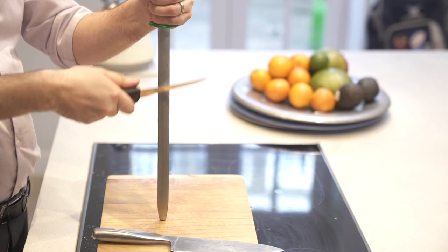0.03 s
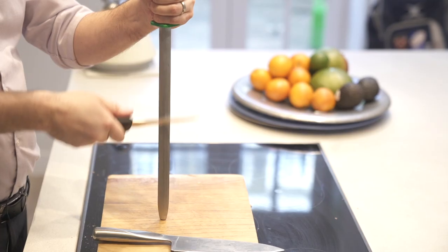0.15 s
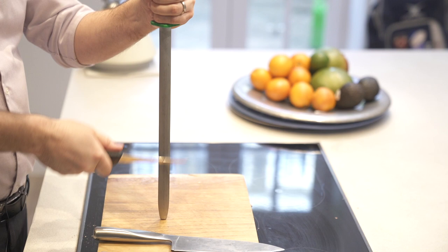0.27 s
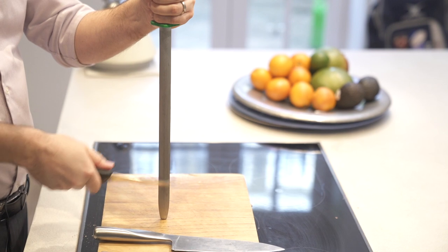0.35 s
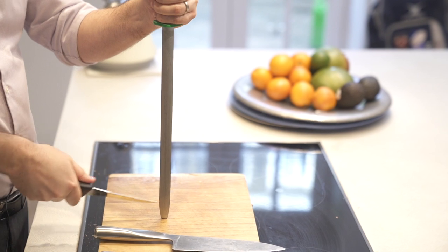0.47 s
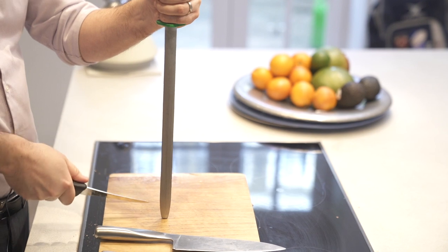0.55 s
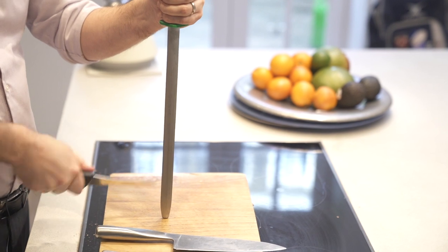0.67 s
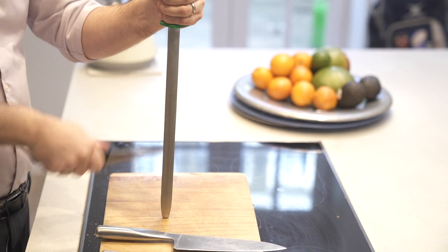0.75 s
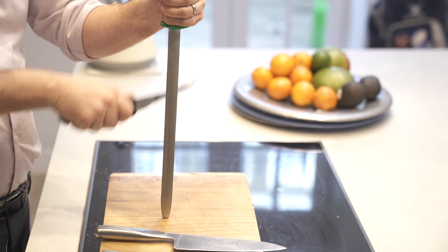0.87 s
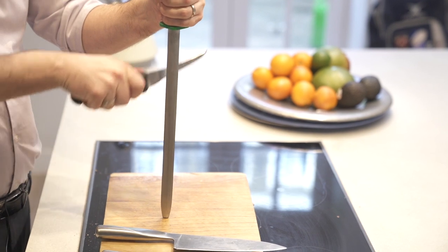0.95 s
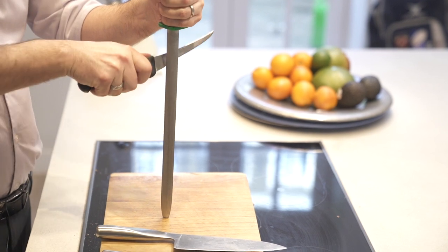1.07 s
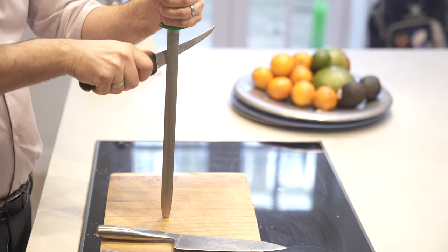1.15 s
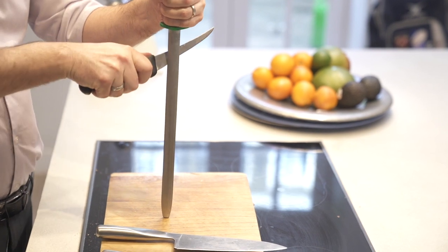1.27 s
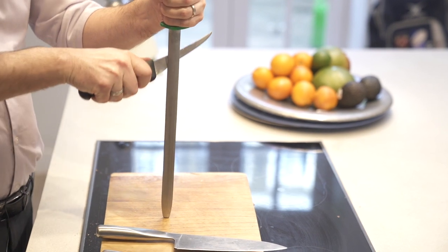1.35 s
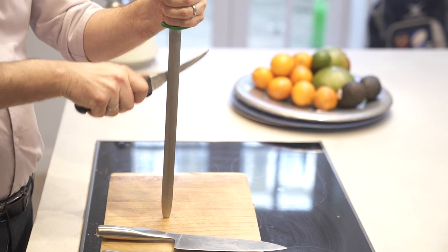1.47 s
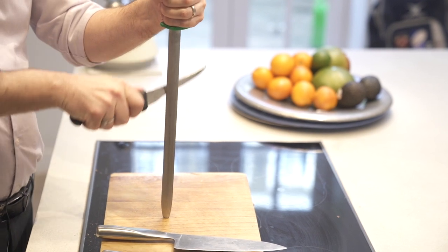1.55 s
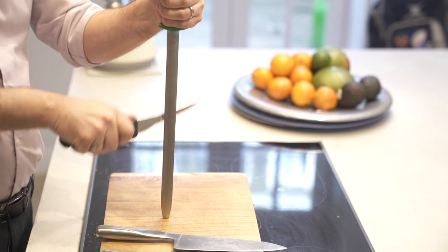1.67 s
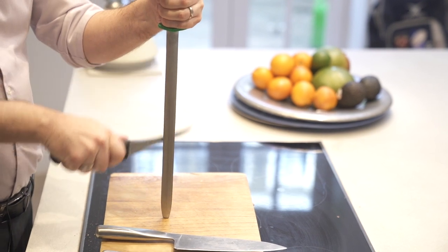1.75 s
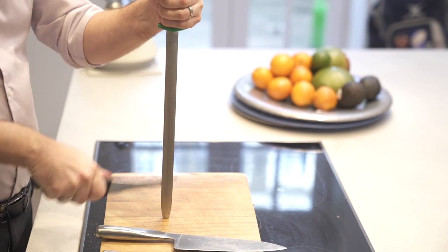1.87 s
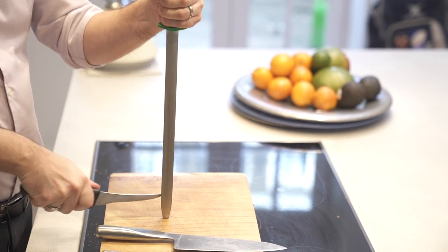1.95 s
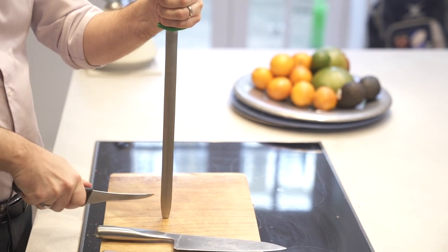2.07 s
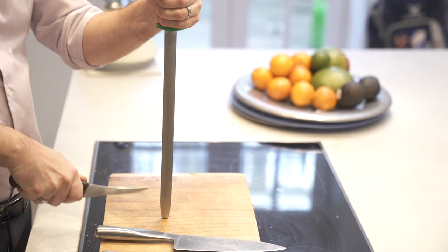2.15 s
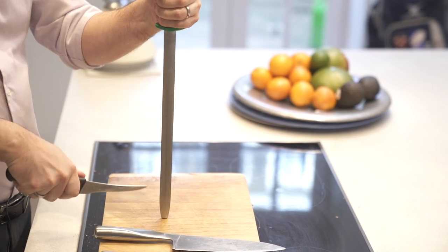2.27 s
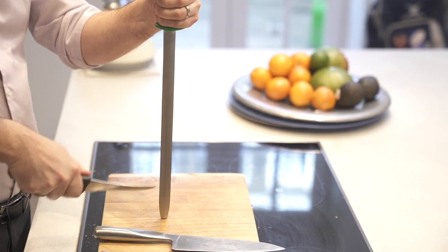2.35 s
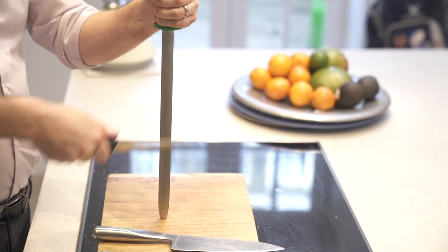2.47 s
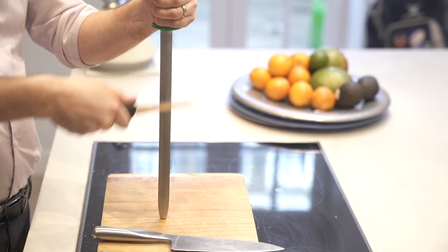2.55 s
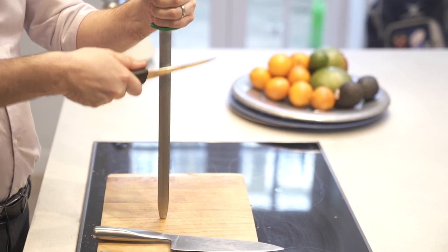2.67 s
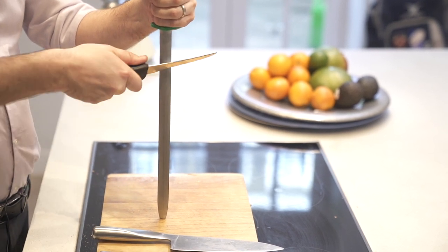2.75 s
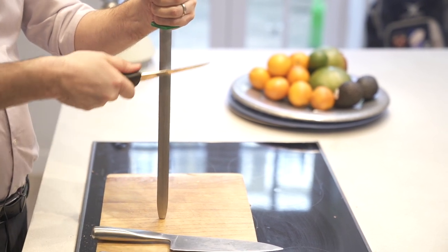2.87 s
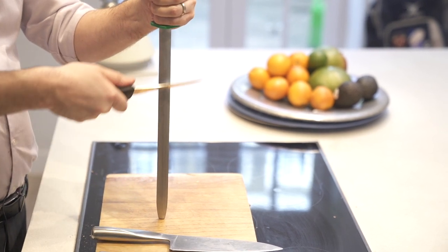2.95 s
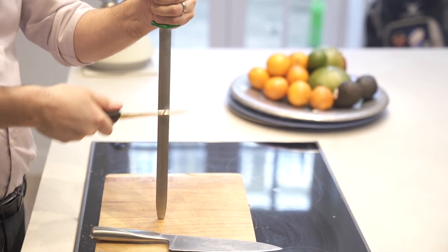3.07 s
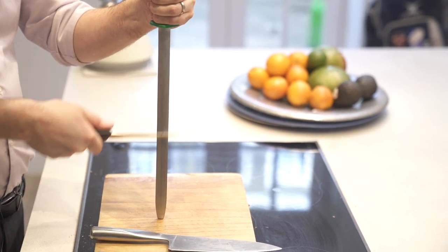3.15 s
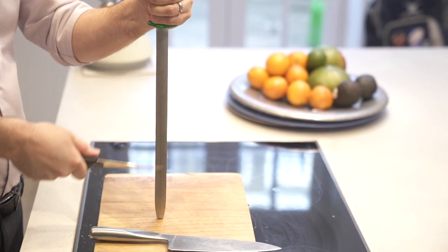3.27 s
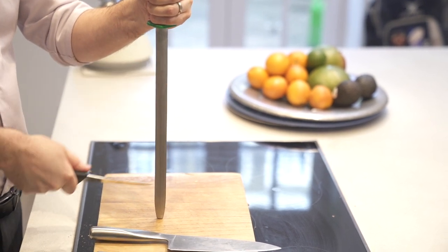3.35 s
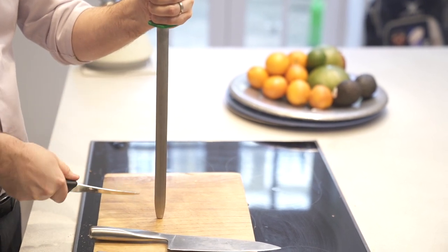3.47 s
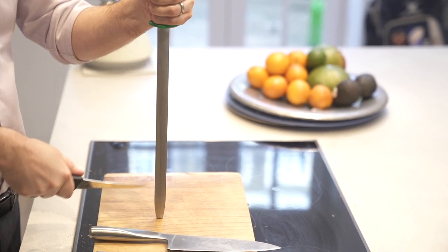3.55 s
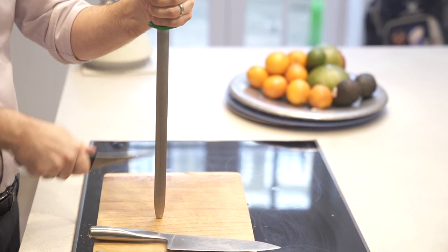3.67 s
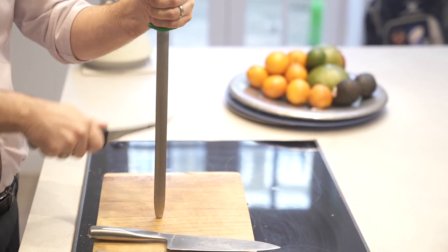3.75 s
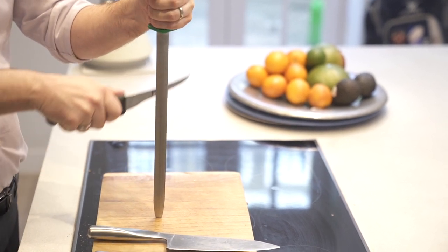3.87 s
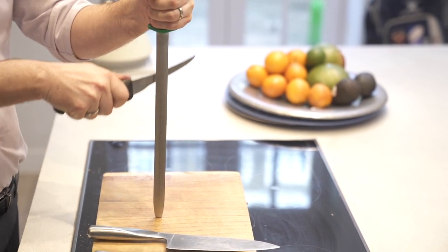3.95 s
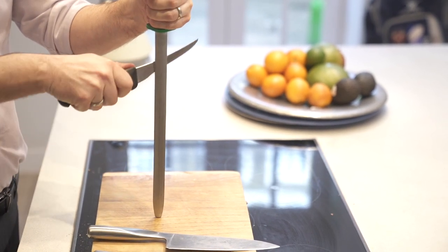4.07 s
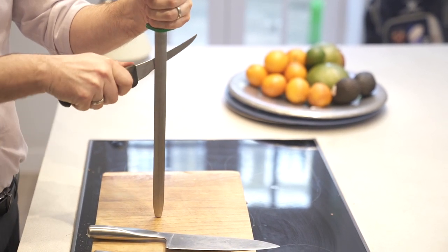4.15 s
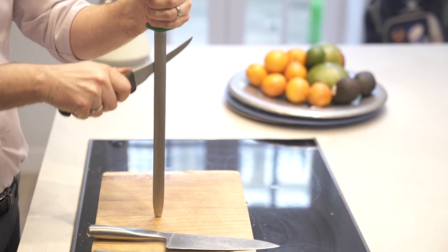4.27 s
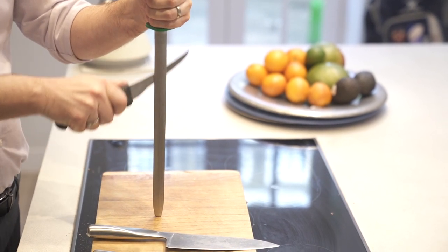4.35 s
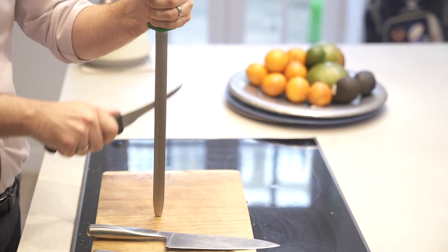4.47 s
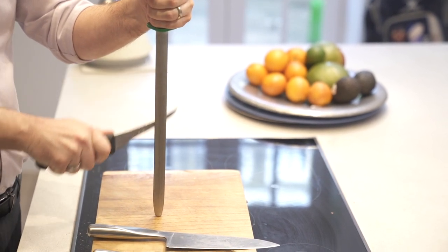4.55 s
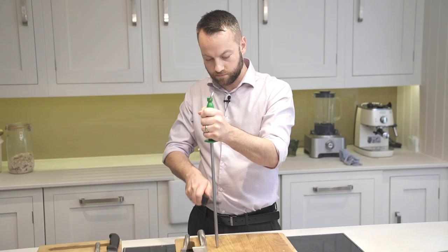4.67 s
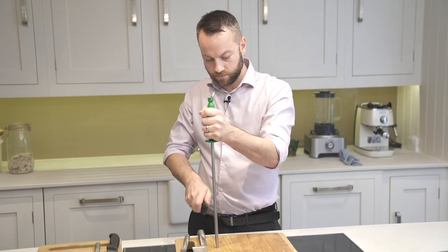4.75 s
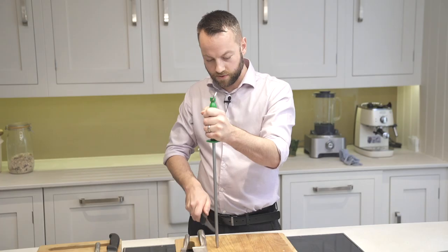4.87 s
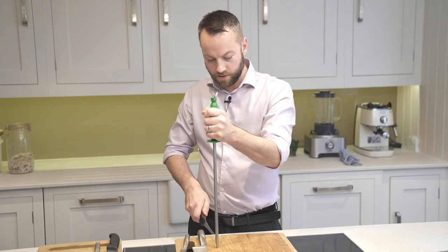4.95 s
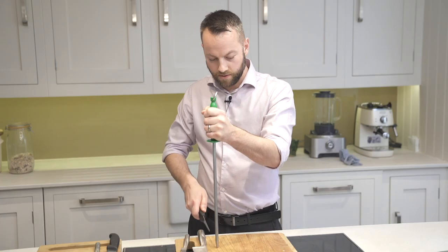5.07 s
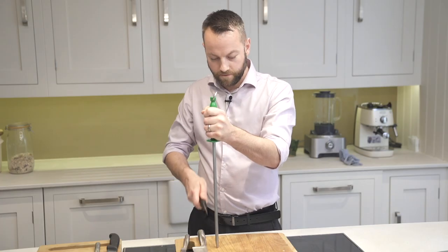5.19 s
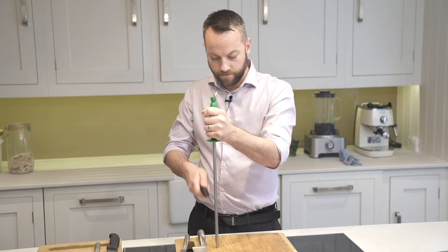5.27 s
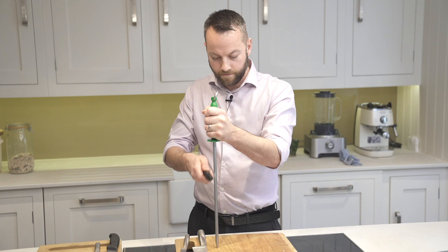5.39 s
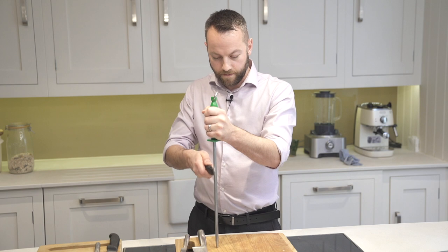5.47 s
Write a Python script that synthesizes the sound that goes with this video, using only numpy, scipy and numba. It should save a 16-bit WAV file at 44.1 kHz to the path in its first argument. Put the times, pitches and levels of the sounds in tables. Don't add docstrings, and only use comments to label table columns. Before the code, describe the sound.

A small knife is honed on an upright steel rod resting on a wooden board in a quiet, hard kitchen. After a very brief fade at the start, the first gritty scrape swells in and rises in pitch until about 0.55 s. A pause of low room hum follows; a small clink at 1.2 s leads to a long firm draw from roughly 1.35 to 2 s, sweeping up to a bright, sharp end. The handle knocks the board very softly at 2.2 s. A click at 2.73 s begins the third firm stroke, lasting to about 3.45 s with a crisp late tick at 3.4 s. Light taps and a dull thud near 4.15-4.3 s precede a lighter fourth scrape, fading out by 4.7 s. The wide stereo room then gives way to a darker mono lapel microphone, with faint scraping and tiny taps until 4.97 s, then only soft background noise, fading slightly to 5.7 s.

```python
import sys
import numpy as np
from scipy import signal
from scipy.fft import rfft, irfft, next_fast_len
from scipy.io import wavfile
from scipy.ndimage import uniform_filter1d
from numba import njit

SR = 44100
rng = np.random.default_rng(int(sys.argv[2]) if len(sys.argv) > 2 else 0)


def boost(x):
    u = np.asarray(x, float) / 20
    return 10 ** u


def dump(signal):
    limited = np.clip(np.atleast_2d(signal).T, -1, 1)
    pcm = np.round(limited * 32767).astype(np.int16)
    wavfile.write(sys.argv[1], SR, pcm)


N = 243546
T = np.arange(N) / SR
PAIR_S, LAPEL_S = 0.027, 4.708


def unit(x):
    return x / np.sqrt(np.mean(x ** 2))


def colour(x, points, share=1):
    hz, db = np.transpose(points)
    size = next_fast_len(x.shape[-1])
    bins = np.log(np.arange(size // 2 + 1) * SR / size + 1)
    gain = boost(share * np.interp(bins, np.log(hz), db))
    return irfft(rfft(x, size) * gain, size)[..., :x.shape[-1]]


@njit
def ring(x, hz, width):
    y, band, low = np.empty((2, len(x))), 0., 0.
    for i in range(len(x)):
        g, damping = np.tan(np.pi * hz[i] / SR), width[i] / hz[i]
        v = (band + g * (x[i] - low)) / (1 + g * (g + damping))
        y[0, i], y[1, i] = damping * v, low + g * v
        band, low = 2 * v - band, low + 2 * g * v
    return y


def mode(x, hz, width):
    hz = np.clip(hz + 0 * T, 50, .45 * SR)
    return ring(x + 1e-18, hz, width + 0 * T)[0] * np.sqrt(1000 / width)


def walk(rate):
    hold = int(SR / rate)
    steps = np.repeat(rng.standard_normal(N // hold + 1), hold)
    return uniform_filter1d(uniform_filter1d(steps, hold), hold)[:N]


# time in seconds, hand pressure as level in dB, first overhang note in Hz.
DRAWS = [
    [(0.03, -67.5, 800), (0.07, -58, 903), (0.166, -46.5, 1140), (0.27, -40, 1576), (0.358, -37.5, 2510),
     (0.49, -44, 3420), (0.56, -89, 3640)],
    [(1.22, -77, 676), (1.36, -53.5, 770), (1.5, -37, 849), (1.6, -40.5, 914), (1.7, -36, 1130),
     (1.81, -36, 1580), (1.87, -30.5, 2260), (1.93, -34, 3160), (1.98, -57, 3500)],
    [(2.75, -39, 842), (2.82, -55.5, 850), (2.89, -44.5, 834), (2.93, -40, 985), (3.05, -36.5, 1360),
     (3.17, -35.5, 2410), (3.252, -34, 2580), (3.36, -40, 2480), (3.47, -45.5, 2670)],
    [(4.16, -60, 950), (4.29, -62, 950), (4.316, -46.5, 910), (4.4, -42.5, 1110), (4.498, -47, 1420),
     (4.608, -49.5, 2120), (4.7, -72.5, 3000)],
    [(4.712, -75.5, 1140), (4.76, -61.5, 1140), (4.83, -57, 860), (4.895, -54, 1143), (4.92, -55.5, 961),
     (4.95, -63, 973)],
]
# level in dB of the first, second and heel-side notes,
# board thud at the heel in dB, brightness in dB.
HOLDS = [
    (0, 1, -2, -13, 7.5),
    (-5, 4.5, 2, 9.5, 6),
    (3, 0, -6, 8, 3.5),
    (2, 0.5, 0, 4.5, 2.5),
    (-2.5, 2, -6, -40, 10.5),
]
# third note in dB, tip note's start in Hz, its rise in Hz per second, its dB.
TIP_NOTES = [
    (1, 800, 280, -13),
    (-2, 1930, 360, -13),
    (-1, 1575, 2100, -6.5),
    (-2, 2170, 500, -12),
    (-7.5, 2400, 6100, -4),
]


def hand():
    level, level_db, hz, late, grip = np.zeros(N), np.zeros(N), np.zeros(N), np.zeros(N), np.zeros((9, N))
    for k, (draw, held) in enumerate(zip(DRAWS, np.hstack([HOLDS, TIP_NOTES]))):
        s, db, first_hz = np.transpose(draw)
        set_s = min(s[0] - .08, LAPEL_S) if k < 4 else LAPEL_S
        now = T >= set_s
        level_db[now] = np.interp(T, s, db)[now]
        level[now] = np.clip(np.minimum(T - s[0], s[-1] - T) / 0.0051, 0, 1)[now]
        hz[now] = np.interp(T, s, first_hz)[now]
        past_belly = (hz[now] > 1950) | (T[now] > LAPEL_S)
        late[now] = np.cumsum(past_belly) / SR
        grip[:, now] = held[:, None]
    return level * boost(level_db), level_db, hz, late, grip


# time in seconds, peak in dB, thud in dB, brightness in dB, length in seconds.
TOUCHES = [
    (1.1878, -27, 8, -2, 0.0038),
    (1.618, -31.5, -9.5, 6, 0.007),
    (2.7275, -23.5, 3.5, 2.5, 0.0049),
    (3.399, -22, -0.5, 9, 0.0035),
    (4.136, -33, -2, 0, 0.0072),
    (4.2, -51, 22.5, 0, 0.0077),
    (4.303, -47.5, 12, 6, 0.019),
    (4.497, -37, 0, 4, 0.005),
    (4.879, -54, -9, -8, 0.0051),
    (4.938, -53.5, -2, 16, 0.0032),
]
# pitch in Hz, level in dB.
GRIT_TONE = [(200, -13), (600, -12), (1500, -4.5), (4000, 1.5), (7000, -0.5), (10000, -8), (13000, -12),
             (16000, -9.5)]


def contact():
    grit = rng.standard_normal(N) * boost(2.12 * np.minimum(rng.exponential(size=N), 5))
    grit = unit(grit * boost(0.98 * walk(40) + 2.0 * walk(200)))
    low = signal.sosfilt(signal.butter(2, 1300, fs=SR, output="sos"), grit)
    high = signal.sosfilt(signal.butter(2, 7800, "high", fs=SR, output="sos"), grit)
    middle = grit - low - high
    level, level_db, hz, _, grip = hand()
    board_thud_db, bright_db = grip[3], grip[4]
    heel = np.clip(np.log(1500 / hz) / np.log(1.5), 0, 1)
    light_db = np.maximum(-43.5 - level_db, 0)
    thud_db = -7 + heel * (board_thud_db + 0.8617 * light_db)
    scrape = level * (boost(thud_db) * low + middle + boost(bright_db) * high)
    taps = 0
    for s, db, tap_thud_db, tap_bright_db, length in TOUCHES:
        burst = (T > s) * np.exp(-np.abs(T - s) / length) * boost(db)
        taps = taps + burst * (boost(tap_thud_db) * low + middle + boost(tap_bright_db) * high)
    return colour(np.array([scrape, taps]), GRIT_TONE)


# first note in Hz, then the first, second, third and heel-side levels in dB.
OVERHANG = [(705, 8.5, -37.5, -12, -12), (786, 7.5, -23, -13.5, -24.5), (922, -8, 9.5, -10.5, -4.5),
            (1130, 5.5, 2.5, 0.5, -9.5), (1450, -2.5, 3.5, -5, -35.5), (2030, -5, -1, -6, -4),
            (2580, -1.5, -2.5, -11, -2.5), (3500, -20, -4.5, -16, 1)]
# multiple of the first note, width relative to pitch,
# widening at the tip as a ratio, level in dB, rod note in Hz that holds it up.
BLADE_BENDING = [
    (1, 0.11, .1, -6, 420),
    (3.62, 0.065, 2.3, -6, 3670),
    (8.7, 0.13, 1.5, 4.5, 2800),
]
# pitch in Hz, width in Hz, level at the heel in dB, level at the tip in dB.
ROD_NOTES = [(278, 71, -7.5, -14.5), (484, 80, 1.5, 2.5), (822.4, 44, -7.5, -9), (1172, 47, -2.5, -37.5),
             (1835, 190, -6, -17), (2518, 78, -2, -7.5), (3640, 450, -2, -13), (4030, 360, -2, 1.5),
             (6240, 320, 4.5, -11), (7370, 140, -31, -39), (9080, 1200, 4.5, -11), (9000, 550, -31, -27.5),
             (12200, 600, -10, -17), (14970, 500, 3.5, -1)]


def steel(scrape, taps):
    force = scrape + boost(-8) * taps
    _, _, hz, late, grip = hand()
    first_grip, second_grip, heel_grip, _, _, third_grip, tip_start_hz, tip_rise, tip_db = grip
    at, *columns = np.transpose(OVERHANG)
    first_db, second_db, third_db, heel_db = (np.interp(np.log(hz), np.log(at), c) for c in columns)
    bend_db = (first_db + first_grip, second_db + second_grip, third_db + third_grip)
    travel = np.clip(np.log(hz / 950) / np.log(2.4), 0, 1)

    heel_hz = np.maximum(7150 - 4500 * late, 6250)
    blade = boost(heel_db + heel_grip) * mode(force, heel_hz, 480)

    tip_hz = tip_start_hz + tip_rise * late
    tip_width = 0.2 * tip_hz
    swell = np.minimum(late / 0.035, 1)
    tip = swell * ring(force, tip_hz, 2 * tip_width)[0]
    blade = blade + boost(tip_db) * mode(tip, tip_hz, tip_width)

    for (multiple, relative_width, widen, db, rod_hz), more_db in zip(BLADE_BENDING, bend_db):
        centre = np.minimum(((multiple * hz) ** 14 + rod_hz ** 14.) ** (1 / 14), 17000)
        centre = np.minimum(centre * (1 + (.012 + .05 * travel) * walk(90)), .4 * SR)
        width = relative_width * centre * (1 + widen * travel)
        blade = blade + boost(db + more_db) * mode(ring(force, centre, 2 * width)[0], centre, width)

    soaked = ring(force + 1e-18, centre, 1.65 * centre)[1]
    soaked = ring(soaked, centre, 1.25 * centre)[1]
    soaked = soaked + boost(-11.5) * scrape + boost(-7) * taps
    drive = soaked + boost(-9.0) * blade
    rod = 0
    for k, (rod_hz, width, near_db, far_db) in enumerate(ROD_NOTES):
        push = drive * boost(near_db + (far_db - near_db) * travel)
        rod = rod + (-1) ** k * mode(push, rod_hz, width)
    return boost(2.5) * (boost(4.5) * blade + boost(-3.5) * rod + boost(-5.5) * soaked)


# time in seconds, peak in dB, length in seconds.
HANDLE_KNOCK = (2.203, -56.5, 0.022)
# pitch in Hz, width in Hz, level in dB.
BOARD_NOTES = [(800, 72, 12.5), (1450, 270, 11.5), (1850, 94, 15.5), (2140, 140, -23), (3670, 600, -4),
               (6200, 740, -31)]


def knock():
    s, db, length = HANDLE_KNOCK
    push = rng.standard_normal(N) * (T > s) * np.exp(-np.abs(T - s) / length) * boost(db)
    return sum(boost(note_db) * mode(push, hz, width) for hz, width, note_db in BOARD_NOTES)


# pitch in Hz, time to fall 60 dB in seconds.
ECHO_TIME = [(300, 0.7), (1200, 0.6), (4000, 0.48), (12000, 0.3)]
# pitch in Hz, side level minus mid level in dB.
ECHO_SIDE = [(100, -22.5), (400, -11.5), (1300, -4.5), (3000, -0.5), (15000, -1)]


def walls():
    t = np.arange(int(.7 * SR)) / SR
    tail = 0
    for hz, t60 in ECHO_TIME:
        band = signal.butter(1, [hz / 2, min(hz * 2, 20000)], "band", fs=SR, output="sos")
        tail = tail + signal.sosfilt(band, rng.standard_normal((2, len(t)))) * boost(-60 * t / t60)
    tail = tail * np.clip(t / .003, 0, 1) * (1 + 2.2 * np.exp(-t / .007))
    tail = tail / np.sqrt(np.sum(tail[0] ** 2))
    tail[1] = colour(tail[1], ECHO_SIDE)
    tail[0, 0] = boost(-8.0)
    return tail


def hum(points, db, count):
    return boost(db + 1.0 * walk(8.7)) * unit(colour(rng.standard_normal((count, N)), points))


# pitch in Hz, level in dB per Hz.
KITCHEN_TONE = [(15, -25), (25, -19.5), (59, 0), (236, -7.5), (394, -11), (641, -10), (840, -21),
                (911, -11.5), (988, -17.5), (1070, -16), (2160, -20), (8360, -26), (16000, -32.5)]
# pitch in Hz, side level minus mid level in dB.
KITCHEN_WIDTH = [(60, -23), (110, -19), (200, -8), (380, -5.5), (700, -0.5), (1290, 0.5), (2380, 1),
                 (4400, 0.5), (8120, -0.5), (15000, 0)]


def kitchen_air():
    mid, side = hum(KITCHEN_TONE, -63, count=2)
    return mid, colour(side, KITCHEN_WIDTH)


# pitch in Hz, level in dB per Hz.
LAPEL_TONE = [(12, -12), (20, 1.5), (91, -7), (168, -13), (367, -8), (574, -13), (1030, -13), (1120, -14.5),
              (2140, -17.5), (3440, -29), (11800, -41), (16000, -46)]


def lapel_air():
    return hum(LAPEL_TONE, -61.5, count=1)[0]


# silent at this time in seconds, full at this time in seconds, bend of the curve as a power.
MIC_FADES = [
    (.027, -.01, 1.1),
    (.027, .58, 1.1),
    (4.708, 4.25, .8),
    (4.708, 5.22, 1.3),
]


def fade():
    gain = boost(-8 * np.maximum(T - 5.2, 0))
    for silent, full, bend in MIC_FADES:
        part = (T - silent) / (full - silent)
        gain = gain * np.where(part >= 0, np.clip(np.abs(part) ** bend, .004, 1), 1)
    return gain


# pitch in Hz, left level minus right level in dB.
PAIR_LEAN = [(100, -1.5), (1500, -1.3), (8000, -3), (15000, 0.5)]


def scene():
    fader = fade()
    knife = steel(*contact() / np.maximum(fader, .012))
    on_pair = (T > PAIR_S) & (T < LAPEL_S)
    stances, shifts_per_s = 6, 7.5
    echoes = [walls() for _ in range(stances)]
    away = (T * shifts_per_s - np.arange(stances)[:, None] + 1) % stances - 1
    parts = (knife * on_pair + knock()) * np.cos(np.clip(away, -1, 1) * np.pi / 2)
    mid, side = sum(signal.fftconvolve(x[None], echo, axes=1)[:, :N] for x, echo in zip(parts, echoes))
    air_mid, air_side = kitchen_air()
    mid, side = mid + air_mid, side + air_side
    pair = np.array([colour(mid + side, PAIR_LEAN, 0.67), colour(mid - side, PAIR_LEAN, -0.16)])

    close = knife * ~on_pair
    short_echo = echoes[0][0] * boost(-60 * T[:echoes[0].shape[1]])
    lapel_room = signal.fftconvolve(close, short_echo)[:N]
    lapel = boost(-6.5) * close + boost(-8) * lapel_room + lapel_air()
    return fader * np.where(on_pair, pair, lapel)


def band_limit(x):
    return signal.sosfilt(signal.butter(12, 16270, fs=SR, output="sos"), x)


def record(dry):
    top_cut = signal.ellip(10, .3, 70, 15800, fs=SR, output="sos")
    mix = signal.sosfilt(top_cut, dry)
    return band_limit(mix)


dry = scene()
out = record(dry)
dump(out)
```